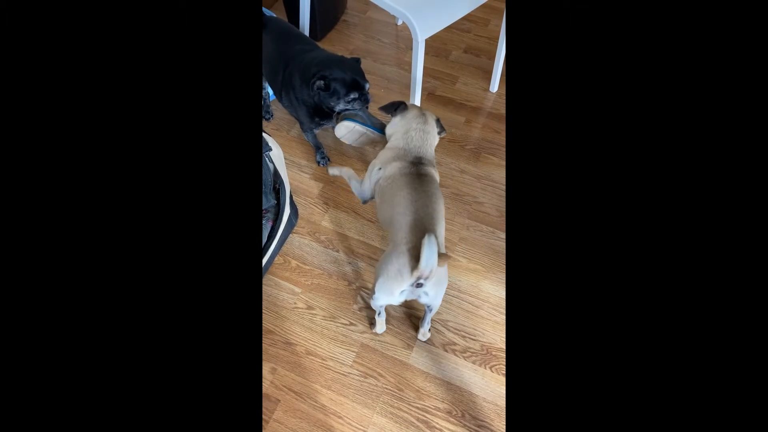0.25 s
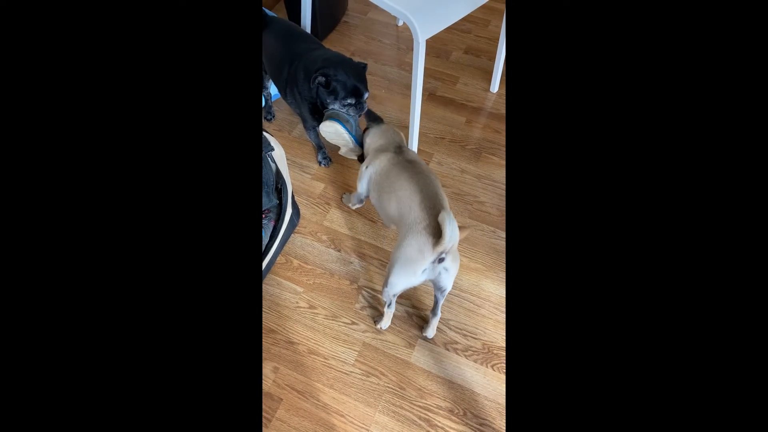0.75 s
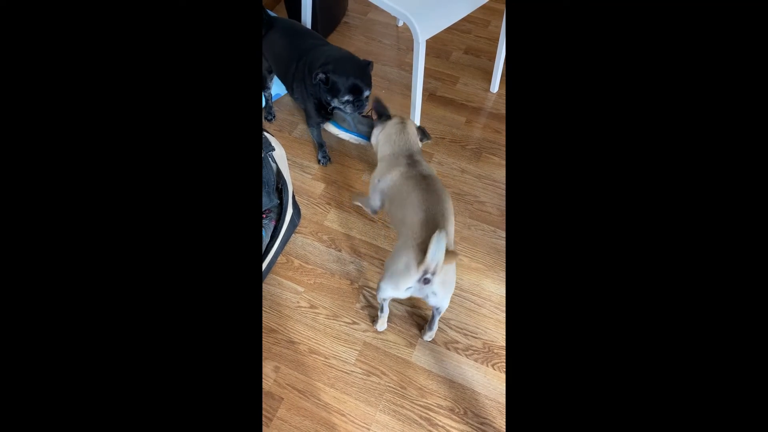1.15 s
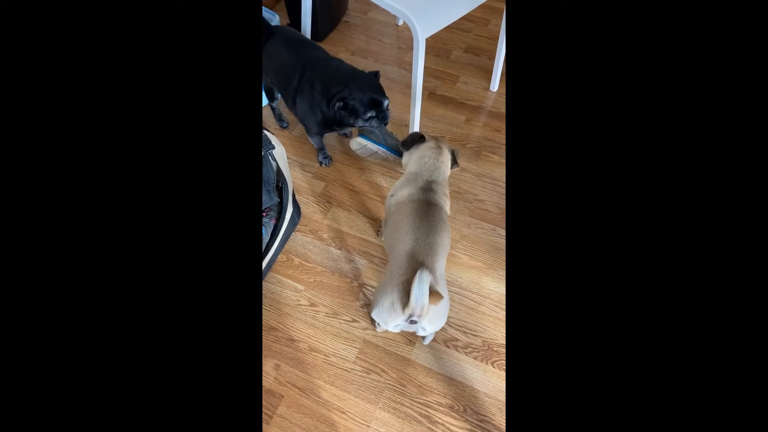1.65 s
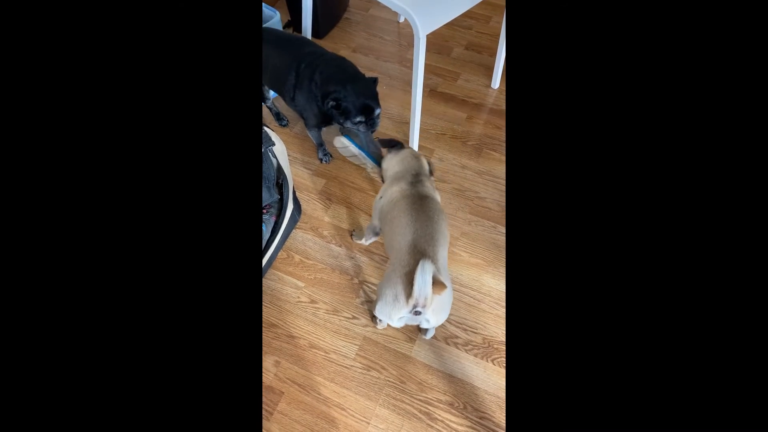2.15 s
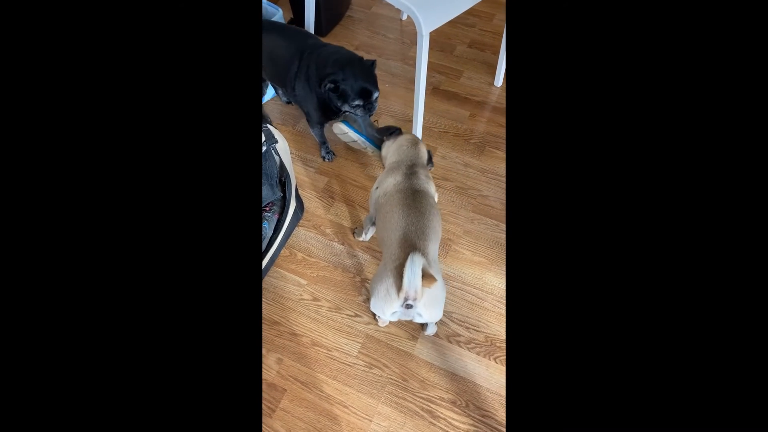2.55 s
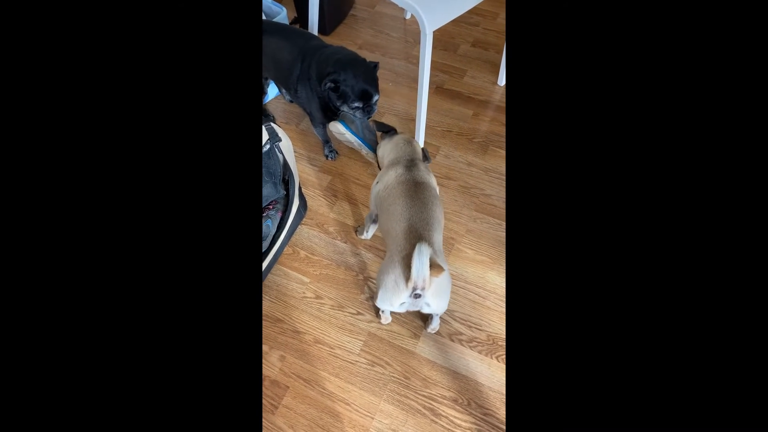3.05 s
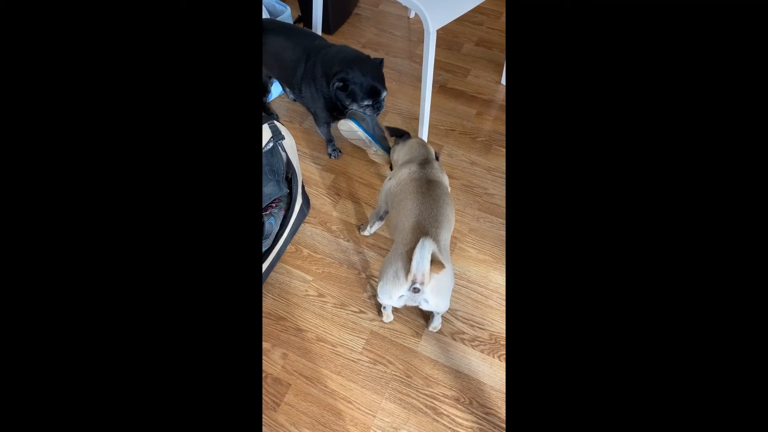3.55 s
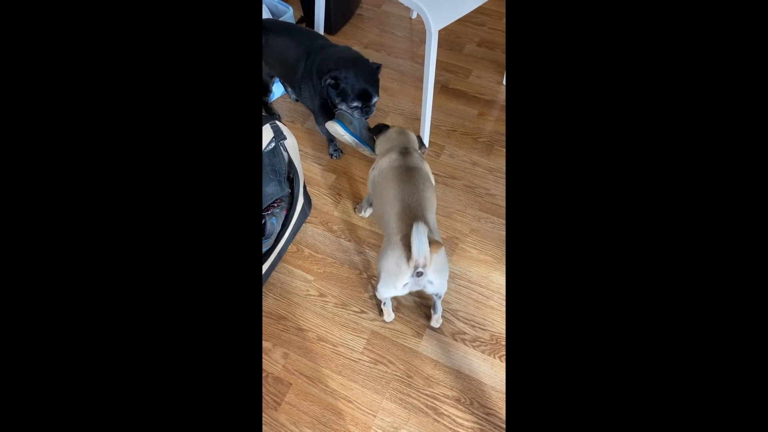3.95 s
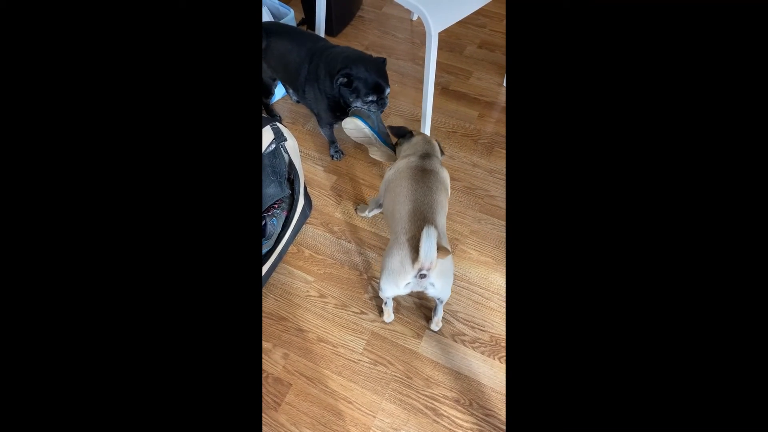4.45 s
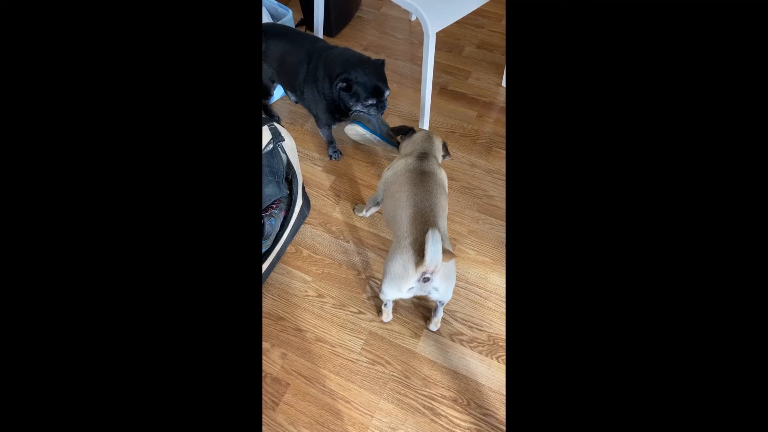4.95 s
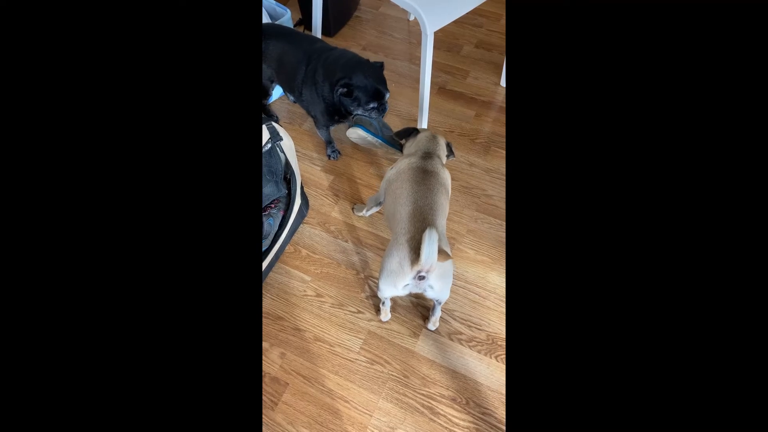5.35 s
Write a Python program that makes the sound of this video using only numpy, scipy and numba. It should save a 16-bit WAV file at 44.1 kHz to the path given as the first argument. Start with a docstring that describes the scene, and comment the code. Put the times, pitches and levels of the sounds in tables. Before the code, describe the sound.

Two pugs play tug with a shoe on a wooden floor, a step from a stereo phone microphone in a small room. From 0 s a low, throaty growl rattles through clenched teeth, with irregular hard throat slaps, nasal hiss and brief steadier, almost sung moments. Sharp claw ticks stand out near 0.8 and 1.4 s. The growl brightens and jumps higher around 1.5 s, then collapses by 1.7 s. Quick snuffs follow at about 1.65 to 1.9 s, a wet jaw smack near 2.2 s and a fluttering snort near 2.3 s. At 2.65 s the second growl catches roughly, then runs lower and more evenly, wavering, sagging around 4 s, recovering, and dropping into a creaky end by 4.65 s. Soft rubbing accompanies the pulling. Afterwards only quiet room rumble, a wavering low appliance hum and very faint shuffles and a rustle remain until about 5.6 s.

```python
"""Pugs tugging at a shoe

A small room with a wooden floor, two pugs a step from a pair of microphones, growling in two long bouts.
Humming vocal folds and slapping throat tissue make the growl: pulses and noise ring throat, mouth and teeth.
Air hisses through the nose with each cycle, and at times the throat steadies and the mouth sings overtones.
Noise bursts make the snuffs, the smacks of the jaws, a late rustle, the rubbing and the ticks of the claws.
Reflections surround the dogs, over soft room rumble and the wavering hum of an appliance."""
import sys
import numpy as np
from scipy import signal
from scipy.fft import rfft, irfft, next_fast_len
from scipy.io import wavfile
from scipy.ndimage import uniform_filter1d
from numba import njit

SR = 44100
rng = np.random.default_rng(int(sys.argv[2]) if len(sys.argv) > 2 else 0)


def store_pcm(level_fs):
    """Save levels as 16-bit WAV."""
    pcm = np.round(np.clip(level_fs, -1, 1) * 32767).astype(np.int16)
    wavfile.write(sys.argv[1], SR, np.atleast_2d(pcm).T)


N = 246500
T = np.arange(N) / SR


def undb(db):
    """Decibels to gain."""
    return 10 ** (np.asarray(db) / 20)


def unit(x):
    """Scale to rms 1."""
    return x / np.sqrt(np.mean(x ** 2))


def even(x, span_s):
    """Hold the rms near 1 over a span, keeping the faster detail."""
    size = int(span_s * SR)
    power = uniform_filter1d(uniform_filter1d(x ** 2, size), size)
    return x / np.sqrt(np.abs(power) + 1e-6 * np.mean(x ** 2))


def noise():
    """White noise as long as the scene."""
    return rng.standard_normal(N)


def walk(rate):
    """Smooth random wandering with a spread near 1, drawn anew `rate` times a second."""
    k = int(SR / rate)
    steps = np.repeat(rng.standard_normal(N // k + 1), k)
    return 1.3 * uniform_filter1d(uniform_filter1d(steps, k), k)[:N]


def curves(rows):
    """Columns of a table, joined by straight lines in time."""
    s, *columns = np.transpose(rows)
    return [np.interp(T, s, c) for c in columns]


def bouts(tables):
    """A gate that is open while any of the tables runs, with softened edges."""
    gate = sum((T >= rows[0][0]) & (T < rows[-1][0]) for rows in tables)
    return uniform_filter1d(1. * gate, SR // 100)


def swell(s, half):
    """A bell-shaped rise and fall around a moment."""
    return np.exp(-.5 * ((T - s) / half) ** 2)


def held(s, half):
    """A flat-topped rise and fall around a moment."""
    return np.exp(-.5 * np.square(np.square((T - s) / half)))


def swells(rows):
    """Summed gain of events (time [s], half length [s], level [dB])."""
    return sum(undb(db) * swell(s, half) for s, half, db in rows)


def colour(x, points):
    """Causal minimum-phase filter with the outline (frequency [Hz], level [dB])."""
    size = 4096
    hz, db = np.transpose(points)
    outline = np.interp(np.log(np.arange(size // 2 + 1) * SR / size + 1), np.log(hz), db)
    cepstrum = irfft(np.log(undb(outline)))
    # folding the cepstrum onto positive times makes the filter causal
    cepstrum[1:size // 2] *= 2
    cepstrum[size // 2 + 1:] = 0
    return signal.fftconvolve(x, irfft(np.exp(rfft(cepstrum))))[:len(x)]


@njit
def resonate(x, hz, width):
    """Band-pass whose centre may move every sample."""
    y, b, l = np.empty(len(x)), 0., 0.
    for i in range(len(x)):
        g, k = np.tan(np.pi * hz[i] / SR), width / hz[i]
        v = (b + g * (x[i] - l)) / (1 + g * (g + k))
        b, l, y[i] = 2 * v - b, l + 2 * g * v, k * v
    return y


def ring_at(x, hz, width):
    """One resonance at a fixed frequency."""
    return resonate(x, np.full(N, 1. * hz), 1. * width)


def ring_twice(x, centre, width):
    """The same resonance passed twice, for steeper sides."""
    return resonate(resonate(x, centre, 1. * width), centre, 1. * width)


# the two growls: (time [s], pitch [Hz], hum of the folds [dB], rasp of the throat [dB])
GROWL_BOUTS = [
    [(0.0, 127.9, -38, -40), (0.09, 134.9, -44.5, -42), (0.12, 142.3, -40.5, -44.5),
     (0.19, 149.9, -39.5, -39.5), (0.35, 141.7, -45, -38.5), (0.47, 146.6, -39.5, -39.5),
     (0.58, 140.3, -44, -38), (0.66, 132.6, -33, -44.5), (0.82, 122.2, -36.5, -45), (1.14, 143.6, -36, -40),
     (1.17, 143.4, -37.5, -39.5), (1.195, 144.4, -43, -34.5), (1.23, 145.1, -43.5, -37.5),
     (1.275, 146.2, -46.5, -35), (1.3, 145.5, -44.5, -38.5), (1.34, 147.4, -40.5, -37.5),
     (1.395, 165.8, -43, -34.5), (1.42, 167.5, -44, -33.5), (1.452, 168, -44, -33.5),
     (1.47, 168.4, -52, -34), (1.53, 205.8, -29.5, -34.5), (1.6, 203.7, -26, -33),
     (1.64, 204.8, -37.5, -44), (1.67, 133.1, -43, -51.5), (1.74, 118.6, -62.5, -60.5)],
    [(2.657, 110.3, -63, -59), (2.69, 110.4, -47, -50.5), (2.735, 124.6, -45.5, -47.5),
     (2.76, 135.7, -36, -43), (2.78, 134.1, -39.5, -38), (2.86, 137.3, -35, -44), (2.92, 135.2, -33.5, -37),
     (2.97, 128.8, -34.5, -47), (3.2, 131.6, -38, -39.5), (3.39, 135.5, -33, -40.5),
     (3.46, 133.5, -36.5, -44.5), (3.66, 125.1, -33.5, -42), (3.78, 123.8, -34.5, -42.5),
     (3.91, 115.1, -39, -43), (4.0, 108.7, -44.5, -44.5), (4.07, 112.6, -43.5, -44),
     (4.11, 123.4, -40, -46), (4.18, 128.3, -34.5, -43), (4.28, 131.9, -36.5, -47), (4.3, 132.6, -36, -44),
     (4.515, 126.1, -33.5, -44), (4.54, 96, -45.5, -48.5), (4.57, 91.7, -44.5, -51.5),
     (4.59, 93.1, -48, -55.5), (4.66, 93, -62, -68.5)],
]
# the mouth's resonance in each growl, moving as the lips shift on the shoe: (time [s], frequency [Hz])
MOUTH_RESONANCE = [
    [(0.0, 576), (0.096, 575), (0.182, 683), (0.942, 710), (1.052, 622), (1.268, 707), (1.484, 670),
     (1.562, 794), (1.585, 720), (1.615, 590), (1.65, 692)],
    [(2.68, 688.5), (3.236, 636.5), (3.342, 704.4), (3.636, 716), (3.67, 817), (3.79, 792), (3.835, 635.7),
     (4.578, 679.9), (4.6, 644.4)],
]
# the lips tremble on the shoe: spread of the mouth's resonance (share), changes per second
TREMBLE, TREMBLE_PER_S = 0.042, 14
# pitch at full roughness: cycle-to-cycle jitter (share), slower wander (share) and its changes per second
CYCLE_JITTER, WAVER, WAVER_PER_S = .03, .02, 28
BREAK_JITTER = .2  # scatter of the pitch (share) where the voice breaks up
# share of the rasp's power that a fully steady throat loses
SINGING_CALMS = 0.74
# the throat catches just before a hard slap
CATCH_LEAD_S, CATCH_S, CATCH_DB = .004, .005, -7


def growl():
    """The voice through clenched teeth, and the nose hiss that pulses with it."""
    hz, hum_db, rasp_db = curves(np.vstack(GROWL_BOUTS))
    singing = steadiness()
    broken = breaking()
    rough = np.maximum(roughness(hum_db, rasp_db), broken) * (1 - singing)
    trembling = 1 + TREMBLE * (1 - singing) * walk(TREMBLE_PER_S)
    mouth_hz = curves(np.vstack(MOUTH_RESONANCE))[0] * trembling
    jitter = rough * (CYCLE_JITTER * walk(110) + WAVER * walk(WAVER_PER_S))
    jitter = jitter + BREAK_JITTER * broken * walk(140)
    cycles = np.cumsum(hz * (1 + jitter)) / SR
    # a puff of air escapes once a cycle
    puff = np.exp(-(cycles % 1) / 0.205)
    leak = (.04 + .05 * rough) * unit(puff * noise())
    force = unit(slaps(cycles, rough, scatter=.12, spread_db=7, stray=.7))
    drive = force + leak
    # the steadier the throat, the more the rattle gives way to sung overtones
    calm = np.sqrt(np.clip(1 - SINGING_CALMS * singing, 0, 1))
    rattle = calm * even(tract(drive, mouth_hz), 0.071)
    catch_db = CATCH_DB * sum(swell(s - CATCH_LEAD_S, CATCH_S) for s, _ in HARD_SLAPS)
    rasp = rattle * undb(rasp_db + catch_db + 0.1) + overtones(cycles, hz)
    voice = folds(cycles, hum_db, rough, broken) + rumble(rasp_db, rough) + rasp
    voice = voice + teeth(drive) + snarls(drive)
    hiss = nose(puff, force) * airflow(rasp_db, singing) * undb(2 * walk(30.2))
    gate = bouts(GROWL_BOUTS)
    return voice * gate + jolts(mouth_hz), hiss * gate


# roughness (0-1) with hum and rasp equally loud, and its rise per dB of rasp over hum
ROUGH_EVEN, ROUGH_PER_DB = .6, 0.02
# a growl softer than this changes its roughness by this much per dB below it
FALTER_DB, FALTER_PER_DB = -41, -0.02


def roughness(hum_db, rasp_db):
    """The throat grows ragged as the rasp outweighs the hum, and smoother as the growl turns faint."""
    faint_db = np.maximum(FALTER_DB - np.maximum(hum_db, rasp_db), 0)
    rough = ROUGH_EVEN + ROUGH_PER_DB * (rasp_db - hum_db) + FALTER_PER_DB * faint_db
    return np.clip(rough, .05, 1)


# the voice breaks up: (time of peak [s], half length [s], amount [0-1])
VOICE_BREAKS = [(.08, .025, 0.55), (.32, 0.03, 0.36), (1.269, 0.048, .5), (1.68, 0.027, 0.99),
                (2.7, .03, .6), (4.03, 0.038, 0.18), (4.582, .04, 0.95)]


def breaking():
    """How far the folds lose their rhythm, 0 to 1."""
    return np.clip(sum(amount * swell(s, half) for s, half, amount in VOICE_BREAKS), 0, 1)


# level of the folds' octave, relative to the hum: (time [s], level [dB])
OCTAVE_LEVEL = [(0, -6), (.09, -1.5), (.2, -3.5), (.33, -2.5), (.6, -0.5), (.68, -20), (.8, -10),
                (1.15, -7), (1.3, -2), (1.46, -5), (1.56, -12.5), (1.7, -11), (2.75, -5.5), (2.9, -12),
                (2.96, -17.5), (3.03, -7.5), (3.3, -9), (3.53, -15), (3.72, -6), (3.89, -13.5), (4.0, -3),
                (4.17, -9), (4.28, -16), (4.34, -8.5), (4.5, -11), (4.6, -2)]
# the folds' third partial, relative to the hum, and the throat resonance that lets it out
THIRD_DB, THIRD_HZ, THIRD_WIDTH_HZ = -17.5, 390, 64
BREAK_DB = 4  # scatter of the level where the voice breaks up


def folds(cycles, hum_db, rough, broken):
    """The smooth airflow through the vocal folds gives the three lowest partials."""
    octave_db = hum_db + curves(OCTAVE_LEVEL)[0]
    hum = undb(hum_db + 0.3 + 1.85 * rough * walk(90)) * np.sin(2 * np.pi * cycles)
    octave_phase = 4 * np.pi * cycles + 0.6 * rough * walk(100)
    octave = undb(octave_db + 5.0 * rough * walk(90)) * np.sin(octave_phase)
    third = ring_at(np.sin(6 * np.pi * cycles), THIRD_HZ, THIRD_WIDTH_HZ)
    third = undb(hum_db + THIRD_DB + 4.49 * rough * walk(60)) * third
    return np.sqrt(2) * (hum + octave + third) * undb(BREAK_DB * broken * (walk(120) - .5))


def rumble(rasp_db, rough):
    """Uneven cycles spill a low noise below and between the partials of the folds."""
    spill = colour(noise(), [(30, -13.0), (60, -3.0), (85, -2.5), (130, -2), (200, 9.5), (300, 1.5),
                             (600, -35), (2000, -88)])
    return undb(rasp_db - 2.5) * rough * unit(spill)


# the hardest ordinary slap, in spreads of force above the usual one
HARDEST_SLAP = 1.25


def slaps(cycles, rough, scatter, spread_db, stray):
    """One slap a cycle; a ragged throat mistimes them, varies their force up to a limit and adds stray ones."""
    at = np.flatnonzero(np.diff(np.floor(cycles)) > 0)
    main_shift, main_chance, stray_shift, stray_chance = rng.standard_normal((len(at), 4)).T
    period, r = np.gradient(at), rough[at]
    main_force = undb(spread_db * r * np.minimum(main_chance, HARDEST_SLAP))
    stray_force = stray * r * undb(spread_db * r * np.minimum(stray_chance, HARDEST_SLAP))
    out = np.zeros(N)
    # stray slaps fall around mid-cycle; offsets are shares of a cycle
    for offset, force in ((scatter * r * main_shift, main_force), (.5 + 0.17 * stray_shift, stray_force)):
        np.add.at(out, np.clip(at + period * offset, 0, N - 1).astype(int), force)
    return out


# outline of throat and closed muzzle: (frequency [Hz], level [dB])
THROAT_OUTLINE = [(150, -29), (280, -12.5), (390, -4), (470, -1.5), (570, -1), (720, -0.5), (880, 0.5),
                  (1100, -12.5), (1300, -11.5), (1580, -14.5), (1780, -31.5), (2250, -35.5), (2550, -38.5),
                  (5000, -54)]
# narrow fixed resonances that colour the growl: (frequency [Hz], width [Hz], level [dB])
FIXED_RESONANCES = [(570, 32, 8), (670, 24, 6), (746.7, 36, 2), (1249, 60, -3.5), (1440, 350, -7)]


def tract(x, mouth_hz, mouth_width_hz=120, mouth_db=0.5):
    """The throat's outline, the fixed resonances, then the mouth's, which moves with the lips."""
    x = colour(x, THROAT_OUTLINE)
    x = x + sum(undb(db) * ring_at(x, hz, width) for hz, width, db in FIXED_RESONANCES)
    return x + undb(mouth_db) * resonate(x, mouth_hz, 1. * mouth_width_hz)


# single hard slaps of the throat: (time [s], level [dB])
HARD_SLAPS = [(0.0815, -29), (0.19, -27), (.2345, -26), (0.2638, -24.5), (0.333, -23), (.4165, -28),
              (0.4317, -27.5), (0.4686, -26), (0.8767, -33), (1.1832, -24), (1.1975, -27), (1.3545, -25.5),
              (2.661, -37.5), (2.698, -33), (2.783, -27), (3.0224, -28), (3.2302, -29)]


def jolts(mouth_hz):
    """Now and then the loose tissue slaps much harder and rings throat and mouth by itself."""
    force = np.zeros(N)
    for s, db in HARD_SLAPS:
        force[int(s * SR)] = undb(db)
    rings = tract(force, mouth_hz)
    # the highest peak takes the level of the hardest slap
    return rings * force.max() / np.abs(rings).max()


# the throat steadies and the mouth sings near one resonance:
# (time of middle [s], half length [s], steadiness [0-1], frequency [Hz], width [Hz], level [dB])
SUNG_MOMENTS = [(0.214, 0.021, 0.49, 750, 91, -38.5), (.36, .025, 0.47, 710, 101, -41.5),
                (.555, 0.034, 0.45, 704, 90, -43.5), (0.691, 0.04, 0.8, 630, 150, -47.5),
                (0.871, 0.064, 0.69, 574, 259.3, -50), (1.062, 0.051, 0.48, 562.6, 130.3, -46.5),
                (1.437, .024, .75, 670, 80.2, -31.5), (1.552, .04, .85, 820, 150, -38.5),
                (2.908, .028, 0.5, 678, 89.9, -43.5), (3.279, 0.036, 0.56, 665, 90.55, -45),
                (3.726, 0.068, .9, 825, 86.14, -42), (3.88, .04, 0.48, 580.5, 69.6, -49),
                (4.241, 0.059, 0.45, 600, 160.3, -51)]


def overtones(cycles, hz, count=9, flutter_db=1.5, slip_rad=.22):
    """Overtones of the folds, strongest near the mouth's resonance; the loose tissue shakes them a little."""
    k = np.arange(3, count + 1)[:, None]
    phase = 2 * np.pi * k * cycles + slip_rad * walk(130)
    out = np.zeros(N)
    for s, half, _, centre_hz, width_hz, db in SUNG_MOMENTS:
        now = np.abs(T - s) < 3 * half
        weight = 1 / (1 + np.square((k * hz[now] - centre_hz) / width_hz)) ** 2
        tone = np.sum(weight * np.cos(phase[:, now]), axis=0)
        tone = tone / np.sqrt(np.sum(weight ** 2, axis=0) / 2)
        out[now] += undb(db) * held(s, half)[now] * tone
    return out * undb(flutter_db * walk(110))


def steadiness():
    """How steady the throat is held while the mouth sings, 0 to 1."""
    return np.clip(sum(steady * held(s, half) for s, half, steady, *_ in SUNG_MOMENTS), 0, 1)


# bright ring of the teeth in each growl: (time [s], frequency [Hz], relative level [dB])
TEETH_RING = [
    [(0.0, 1670, -66), (0.148, 1800, -59.5), (0.202, 1997, -58.5), (0.712, 1965, -61), (0.872, 1990, -65),
     (0.948, 1940, -58), (1.19, 1982, -51.5), (1.31, 2027, -56.5), (1.382, 1883, -56), (1.542, 1924, -62),
     (1.556, 1869, -50), (1.652, 1959, -58), (1.73, 2017, -79)],
    [(2.65, 1868, -88), (2.68, 1863, -63.5), (2.78, 1982, -62.5), (3.27, 2030, -58.5), (3.43, 2014, -62.5),
     (3.75, 2016, -64), (3.94, 2020, -62), (4.17, 1911, -63), (4.23, 1896, -55.5), (4.26, 1944, -63.5),
     (4.43, 1959, -60.5), (4.63, 1870, -75), (4.66, 1936, -86)],
]


def teeth(drive, upper_ratio=1.18, upper_db=-7, width_hz=218.0, gain_db=-2.0, quiver=.022, flicker_db=3):
    """The gap between teeth and shoe rings with a close pair of bright resonances that move and flutter."""
    hz, db = curves(np.vstack(TEETH_RING))
    hz = hz * (1 + quiver * walk(28))
    lower = ring_twice(drive, hz, width_hz)
    upper = ring_twice(drive, upper_ratio * hz, width_hz / 2)
    level = undb(db + gain_db + flicker_db * walk(34))
    return level * even(lower + undb(upper_db) * upper, 0.083)


# the lips curl back and let a resonance out:
# (time of peak [s], half length [s], frequency [Hz], width [Hz], level [dB])
LIP_CURLS = [(0.329, 0.19, 3010, 573, -62.5), (1.23, 0.032, 2240, 300, -64),
             (2.736, 0.0097, 1600, 350, -53.5), (2.788, 0.016, 1627, 301, -54),
             (3.038, 0.025, 877, 127.8, -44.5), (3.3, 0.05, 887, 139.8, -48), (3.2, 0.3, 5950, 1200, -70)]


def snarls(drive):
    """Brief resonances of the bared teeth, fed by the same pulses as the throat."""
    out = 0
    for s, half, hz, width, db in LIP_CURLS:
        ring = ring_twice(drive, np.full(N, 1. * hz), width)
        out = out + undb(db) * swell(s, half) * even(ring, 0.05)
    return out


# outline of the nose hiss under the voice: (frequency [Hz], level [dB])
NOSE_OUTLINE = [(1500, -3.5), (2500, -8.5), (3100, -4.5), (4200, 3), (5200, -3), (6400, 1.5), (7800, 0),
                (9000, -2.5), (10700, 3), (12300, -24.5), (14000, -3), (15800, -3)]


def nose(puff, force, whistle_hz=8500.0, whistle_width_hz=700., whistle_db=-2, drift=0.034, crackle_db=-6):
    """Air hisses in uneven puffs, a resonance shifts as the nostrils flare, and each slap crackles wetly."""
    uneven_puff = puff * undb(2.5 * walk(130)) + 0.15
    air = colour(uneven_puff * noise(), NOSE_OUTLINE)
    centre = np.clip(whistle_hz * (1 + drift * walk(4)), 1000, SR / 3)
    whistle = undb(whistle_db) * resonate(air, centre, 1. * whistle_width_hz)
    crackle = colour(force, [(1500, -22), (2700, -2), (4000, -1.0), (5200, -5.0), (6300, 2.5),
                             (9000, -4.0), (15000, -14.5)])
    return unit(unit(air + whistle) + undb(crackle_db) * unit(crackle))


# nose hiss at the usual rasp: one level [dB] for each growl
AIR_LEVELS = [-56.5, -57]
# extra spurts through the nose while growling: (time of peak [s], half length [s], level [dB])
NOSE_SPURTS = [(.122, 0.0045, -54), (1.19, 0.004, -49), (2.677, 0.0055, -48.5), (2.691, 0.0033, -48),
               (4.52, 0.025, -68), (.36, 0.11, -66), (4.36, 0.084, -66)]
# the usual rasp, and the dB of hiss gained per dB of rasp
USUAL_RASP_DB, AIR_PER_RASP = -37, 0.31
# the airflow starts this far down in each growl and builds up
AIR_START_DB, AIR_BUILD_S = -8.5, 0.044
# a singing mouth takes air from the nose; below a faint rasp the airflow dies away with the voice
AIR_SINGING_DB, AIR_FAILS_DB = -0.5, -54.5


def airflow(rasp_db, singing):
    """Gain of the nose hiss: it builds up in each growl, follows the rasp, spurts and dies with the voice."""
    starts = [rows[0][0] for rows in GROWL_BOUTS]
    fresh = sum((T >= s) * np.exp(-np.abs(T - s) / AIR_BUILD_S) for s in starts)
    db = np.where(T < starts[1], *AIR_LEVELS) + AIR_PER_RASP * (rasp_db - USUAL_RASP_DB)
    db = db + np.minimum(rasp_db - AIR_FAILS_DB, 0)
    return undb(db + AIR_START_DB * fresh + AIR_SINGING_DB * singing) + swells(NOSE_SPURTS)


# snuffs: (time of peak [s], half length [s], rush [dB], hiss of the pinched nostrils [dB], palate flutter [dB])
SNUFF_EVENTS = [(1.651, 0.028, -48.5, -61, -50), (1.743, 0.025, -61, -65.5, -70),
                (1.862, 0.011, -47.5, -47, -78), (1.91, 0.013, -49, -73, -72),
                (2.333, 0.028, -52, -49.5, -49), (2.571, 0.032, -61, -66.5, -75)]
# outline of the rush of a free snuff: (frequency [Hz], level [dB])
RUSH_OUTLINE = [(300, -13), (1200, -3), (2100, -5.5), (3000, 9), (4500, 13), (7000, -3.5), (9500, -1),
                (11500, -16.5), (13500, 1), (15500, -21)]
# outline of the hiss of pinched nostrils: (frequency [Hz], level [dB])
PINCH_OUTLINE = [(2000, -32), (5000, -12.5), (7000, 1.5), (9000, 3), (11500, -6), (15000, -12)]


def snuffs():
    """Short rushes of air through the nose, a hiss where the nostrils pinch, and the soft palate fluttering."""
    rush = swells((s, half, db) for s, half, db, _, _ in SNUFF_EVENTS)
    pinch = swells((s, half, db) for s, half, _, db, _ in SNUFF_EVENTS)
    flutter = swells((s, half, db) for s, half, _, _, db in SNUFF_EVENTS)
    air = rush * unit(colour(noise(), RUSH_OUTLINE)) + pinch * unit(colour(noise(), PINCH_OUTLINE))
    flutter_hz = 124 * (1 + 0.082 * walk(80))
    palate = unit(np.sin(2 * np.pi * np.cumsum(flutter_hz) / SR))
    return flutter * palate, air * undb(2.6 * walk(200))


# wet smacks and grunts of the jaws on the shoe, and last a faint rustle:
# (time [s], level [dB], frequency [Hz], decay [s])
SMACKS_AND_RUSTLE = [(1.91, -49.5, 4270, 0.0051), (1.912, -55.5, 1730, 0.0092), (2.196, -47, 1220, 0.0052),
                     (2.657, -46, 579, 0.0065), (5.331, -72.5, 1500, 0.03)]


def smacks_and_rustle(width_share=0.72):
    """Brief resonant noise bursts: the mouth rings as the jaws shift their grip, and last comes a faint rustle."""
    out = 0
    for s, db, hz, decay in SMACKS_AND_RUSTLE:
        burst = (T >= s) * np.exp(-np.abs(T - s) / decay)
        ring = ring_twice(burst * noise(), np.full(N, 1. * hz), width_share * hz)
        out = out + undb(db) * ring * np.linalg.norm(burst) / np.linalg.norm(ring)
    return out


# claws on the boards: (time [s], relative level [dB])
CLAW_TICKS = [(0.336, -37), (0.7671, -21), (1.0924, -45), (1.1893, -46), (1.3641, -21), (1.3666, -22.5),
              (1.3766, -36), (1.402, -36), (1.723, -37), (1.762, -45), (1.9102, -29), (2.2067, -42),
              (2.241, -37), (2.386, -44), (2.658, -46), (3.3631, -40.5), (3.5391, -41), (3.9027, -38)]
# outline of a claw's tick: (frequency [Hz], level [dB])
TICK_OUTLINE = [(500, -30.5), (2000, -22.5), (2900, -12), (3900, -5), (5000, -14.5), (6600, -13.5),
                (8700, -3), (10300, -6.5), (12000, -16.5), (13600, -8.5), (16000, -20.5)]


def claws(tick_s=0.0008, scrape_s=0.006, scrape=.06, strike=4.2, gain_db=5):
    """Each claw strikes sharply, chatters and scrapes for a moment."""
    force = np.zeros(N)
    for s, db in CLAW_TICKS:
        age = T[:N - int(s * SR)]
        fading = np.exp(-age / tick_s) + scrape * np.exp(-age / scrape_s)
        chatter = fading * rng.standard_normal(len(age))
        force[-len(age):] += undb(db + gain_db) * np.where(age == 0, strike, chatter)
    return colour(force, TICK_OUTLINE)


# paws and shoe shuffling on the boards: (time of peak [s], half length [s], level [dB])
FLOOR_SHUFFLES = [(1.68, 0.078, -69), (2.0, 0.17, -69.5), (2.212, 0.023, -65), (2.36, 0.075, -68.5),
                  (2.6, .05, -75), (4.83, .04, -81), (5.16, 0.091, -74), (5.36, 0.023, -74),
                  (5.57, 0.044, -76.5)]
# the rubbing of the tug goes on under each growl, this far below the rasp
TUG_DB = -16.5


def shuffle():
    """Soft, uneven rubbing noise: it follows the rasp while the dogs growl and pull, and adds short shifts."""
    rub = colour(noise(), [(200, -15.0), (500, 6.0), (1000, 6), (1400, -2.0), (1700, -9), (1860, -9),
                           (1950, 1.5), (2060, -10), (2400, -15.0), (4200, -12.5), (9000, -34.0)])
    uneven_db = 3 * walk(40)
    _, _, rasp_db = curves(np.vstack(GROWL_BOUTS))
    tug = undb(rasp_db + TUG_DB) * bouts(GROWL_BOUTS)
    return unit(rub) * (tug + swells(FLOOR_SHUFFLES)) * undb(uneven_db)


def bounces(x, shoe_s=0.000833, floor_s=.0021, share=0.35, sway=0.15):
    """The shoe and the boards throw back close echoes that shift as the heads move."""
    echoes = sum(np.interp(T - lag * (1 + sway * walk(3.0)), T, x) for lag in (shoe_s, floor_s))
    return (x + share * echoes) / np.sqrt(1 + share ** 2)


# extra travel time to the right microphone
PORT_LAG_S = 0.00012


def ports(x):
    """Sound from the left reaches the right microphone a little later."""
    size = next_fast_len(N + SR // 10)
    hz = np.arange(size // 2 + 1) * SR / size
    late = irfft(rfft(x, size) * np.exp(-2j * np.pi * hz * PORT_LAG_S), size)[:N]
    return np.array([x, late])


def room(x, wet_db, t60_s, bass_db, shifts_per_s=2.192):
    """Dense reflections, different at each side and changing as the dogs move; the bass stays mostly direct."""
    age = T[:int(.7 * SR)]
    tail = np.exp(-np.log(1000) * age / t60_s) * (age > .003)
    tilted = colour(x, [(200, bass_db), (650, -7), (1100, 0), (2200, 0), (4000, -2), (8000, -2), (15000, -5)])
    # the sound turns between two sets of reflections
    turn = np.pi / 2 * walk(shifts_per_s)
    sides = []
    for _ in range(2):
        side = 0
        for share in (np.cos(turn), np.sin(turn)):
            reflections = tail * rng.standard_normal(len(age))
            side = side + signal.fftconvolve(tilted * share, reflections)[:N]
        sides.append(side)
    return undb(wet_db) * np.array(sides) / np.linalg.norm(tail)


# outline of the quiet room: (frequency [Hz], relative level [dB])
QUIET_OUTLINE = [(15, -67.5), (25, -25), (49, -3), (71, -5), (90, -23.5), (109, -10), (237, 2), (344, -13),
                 (404, -3.5), (462, -16.5), (1390, -36.5), (1670, -45.5), (1910, -37), (2180, -46),
                 (15000, -51)]
# lines of the appliance hum: (frequency [Hz], level [dB])
HUM_LINES = [(59.3, -65), (119, -69.5), (238, -78.5)]


def background(quiet_db=-58.5):
    """Soft room rumble spread over both microphones, and the wavering hum of an appliance in the middle."""
    mid = unit(colour(noise(), QUIET_OUTLINE))
    side = unit(colour(noise(), QUIET_OUTLINE))
    side = colour(side, [(100, -8.0), (300, -12.5), (1000, 12.0), (4000, 2)])
    hum = 0
    for hz, db in HUM_LINES:
        line = unit(np.sin(2 * np.pi * hz * T + 1.0 * walk(2.4)))
        hum = hum + undb(db + walk(15)) * line
    return undb(quiet_db) * np.array([mid + side, mid - side]) + hum


def scene():
    """Both dogs a step away, with the room around them."""
    voice, hiss = growl()
    flutter, rush = snuffs()
    low = voice + flutter + smacks_and_rustle() + shuffle()
    breath, ticks = bounces(hiss + rush), claws()
    # the upper part of the voice arrives weaker on the right
    low_right = colour(low, [(130, -1.2), (300, -0.5), (650, -2.0), (1100, -3.5), (2000, -3.5)])
    direct = np.array([low, low_right]) + ports(breath + ticks)
    walls = room(low, wet_db=2.5, t60_s=0.14, bass_db=-23.0)
    walls = walls + room(breath + undb(-1.0) * ticks, wet_db=-2.0, t60_s=0.29, bass_db=-16.5)
    return direct + walls + background()


TOP_HZ = 15800


def record(dry):
    """The phone behind the microphones cuts the top with a steep low-pass."""
    return signal.sosfilt(signal.ellip(10, .2, 80, TOP_HZ, fs=SR, output="sos"), dry)


dry = scene()
out = record(dry)
store_pcm(out)
```